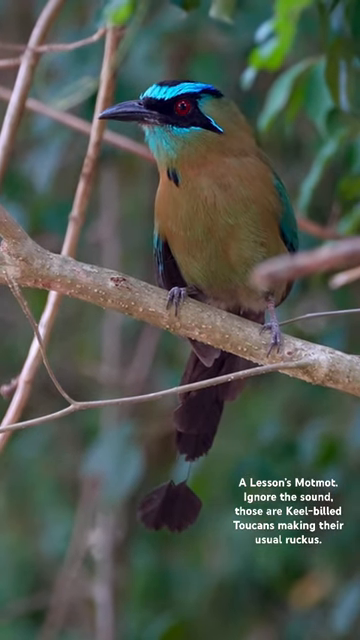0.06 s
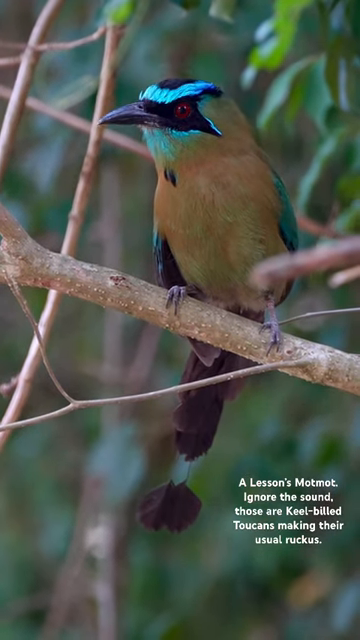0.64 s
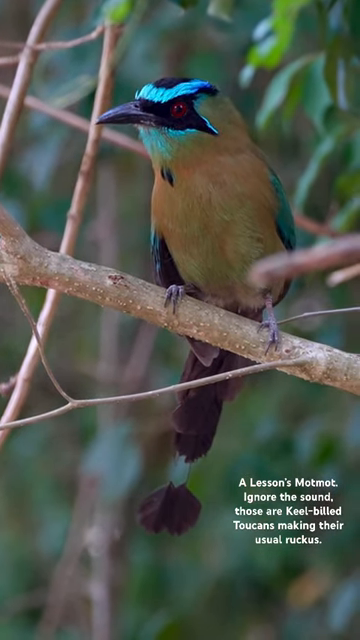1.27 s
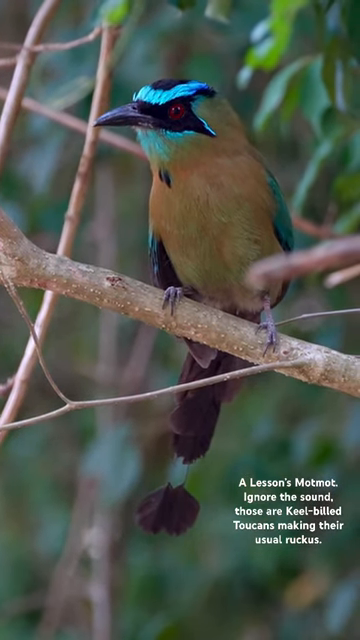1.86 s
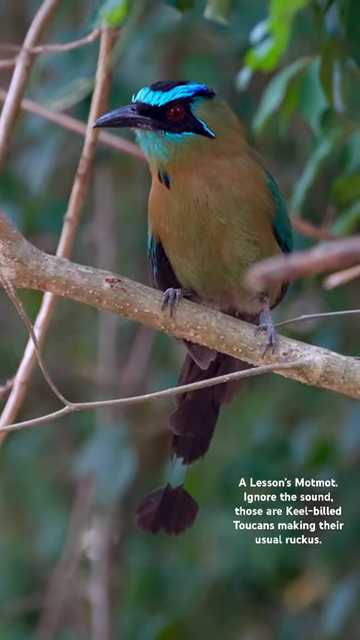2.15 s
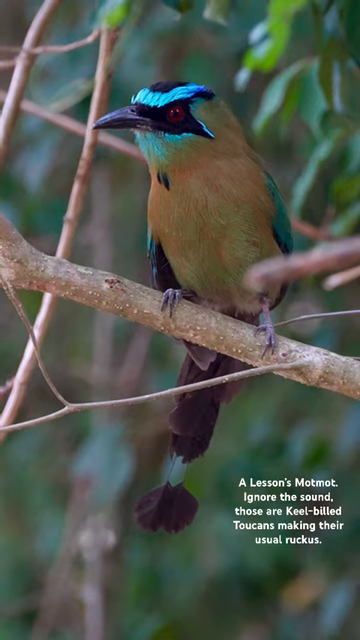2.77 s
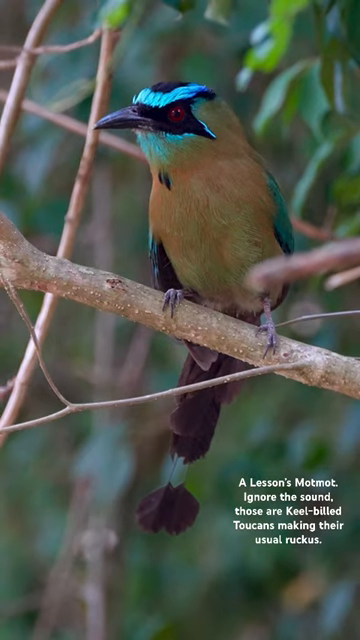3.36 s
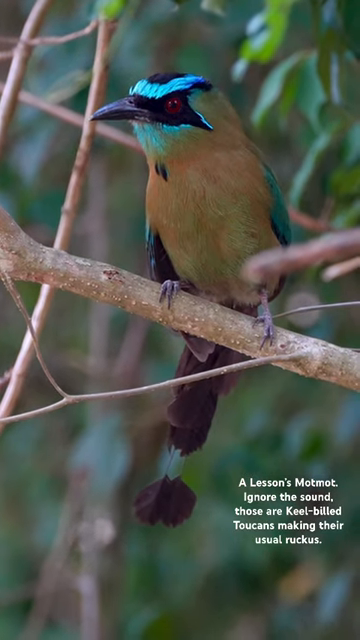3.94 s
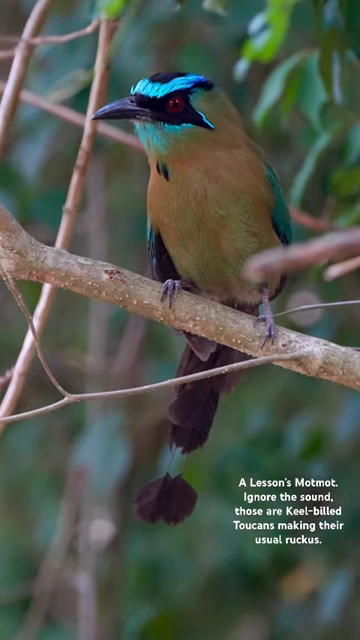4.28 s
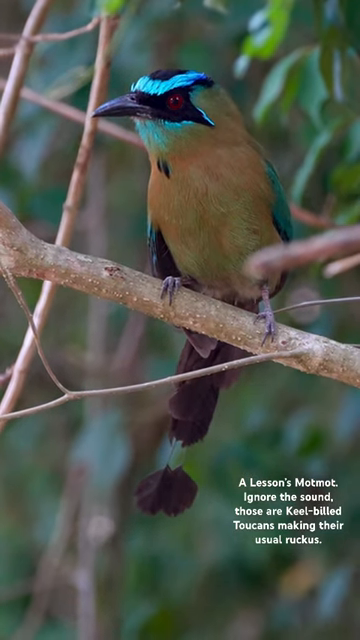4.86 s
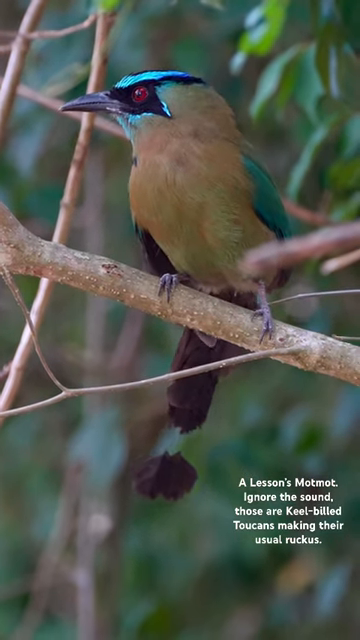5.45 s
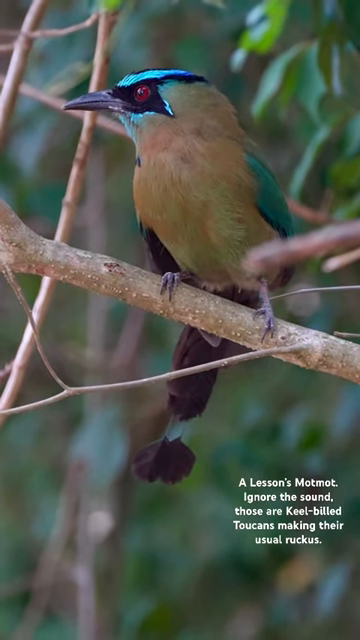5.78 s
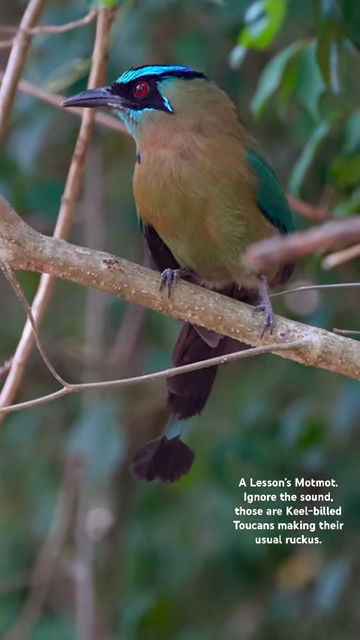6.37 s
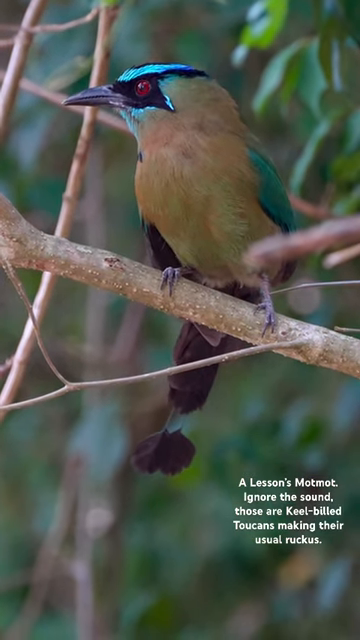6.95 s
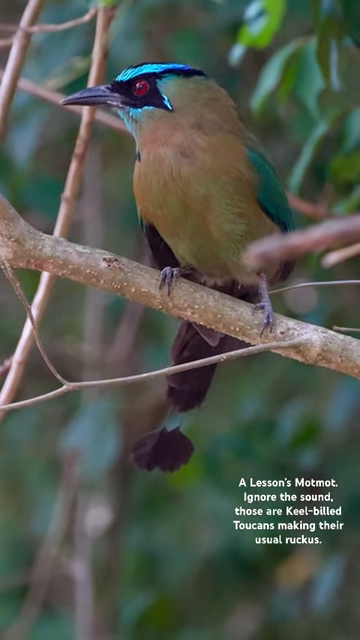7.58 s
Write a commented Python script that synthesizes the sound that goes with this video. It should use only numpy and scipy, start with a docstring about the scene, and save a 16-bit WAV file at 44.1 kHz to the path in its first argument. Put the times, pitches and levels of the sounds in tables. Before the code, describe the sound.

Two toucans take turns croaking in a forest, one harsh and raspy, the other mellower and a little louder. Each croak is a short, quickening rattle, repeated a little more than once a second by each bird. Behind them insects hiss and ring steadily at a high pitch. Small birds add faint chips, twitters and falling whistles, mostly near the end. The trees give the calls a soft echo.

```python
"""A rasping toucan croaks over hissing insects; a mellow one answers, and the two take turns.
Each croak is a quickening rattle of tone bursts from the syrinx, filtered by throat and bill.
Small birds whistle, chip and twitter. Insects hiss and ring over a very faint low rumble.
The shrill high hiss briefly drops out in one channel or the other.
Forest trunks give the birds a few early echoes, foliage a soft tail."""
import sys
import numpy as np
from scipy import signal
from scipy.fft import rfft, irfft
from scipy.io import wavfile
from scipy.ndimage import uniform_filter1d

SR = 44100
rng = np.random.default_rng(int(sys.argv[2]) if len(sys.argv) > 2 else 0)


def wrap_up_sound(samples):
    """Save the sound to the file named by the first command line argument, as 16-bit audio."""
    columns = np.atleast_2d(samples).T
    # keep every value between -1 and 1, then stretch to whole-number steps
    tamed = np.clip(columns, -1, 1)
    steps = np.round(tamed * 32767).astype(np.int16)
    wavfile.write(sys.argv[1], SR, steps)


N = 336042
TIME_S = np.arange(N) / SR

# noise spectra (frequency [Hz], density [dB])
RUMBLE_SPECTRUM = [(20, -3.5), (42, -7), (55, 0), (70, -9), (120, -17), (250, -13.5), (400, -20.5),
                   (1300, -25), (3000, -31)]
WIDE_AIR_SPECTRUM = [(30, 1), (250, -3), (500, -1.5), (1400, -.5), (4000, -19.5)]
HISS_SPECTRUM = [(1300, -35.5), (2000, -15), (2700, -10), (3300, -9.5), (4200, -8.5), (5000, -3),
                 (5700, -2), (6800, -4.5), (8000, -9.5), (9000, -7), (9800, -15.5), (12000, -14),
                 (15000, -12.5)]
SHRILL_SPECTRUM = [(9000, -45), (10500, -11), (11800, -0.5), (12600, -4), (13300, -5), (14500, -1),
                   (15200, -6)]
RASP_SPECTRUM = [(1400, -20), (1650, -9), (1950, 10.5), (2550, -13.5), (3100, -11.5), (3650, -12.5),
                 (4400, -10.5), (5400, -16), (9000, -27)]
# reverb spectra (frequency [Hz], gain [dB])
SONGBIRD_TAIL = [(3000, 3.5), (6000, -1), (10000, 5)]
TOUCAN_TAIL = [(1500, -.5), (1730, -7), (1805, -1), (1870, -5), (1950, -4), (3500, -3), (8000, -3.5)]
# vocal tract responses (frequency [Hz], gain [dB])
CHIP_THROAT = [(3100, -28), (3700, -10.5), (4600, -20), (6000, -6), (8200, -12), (9200, -21)]
TOUCAN_BILL = [(1300, -52), (1480, -11.5), (1620, -5), (1830, -1), (2050, -3), (2450, -5), (3300, -3),
               (5600, 0), (9000, -13)]
# trunk echoes (delay [s], level [dB])
TRUNK_ECHOES = [(.0062, -18), (.0122, -12), (.026, -21), (.043, -23)]
# ringing insects (frequency [Hz], level [dB])
INSECT_TONES = [(5707, -78), (6137, -75), (7246, -81), (8559, -84), (10664, -90.5), (11413, -83.5),
                (11854, -79), (12042, -81.5), (12516, -77.5), (13808, -81), (14266, -72), (14535, -79.5),
                (14707, -79.5)]
# the shrill high hiss briefly drops out in one channel (start [s], end [s])
LEFT_DROPOUTS = [(.40, 1.25)]
RIGHT_DROPOUTS = [(-.2, .52), (6.27, 7.29)]
# thin rising whistles (time [s], length [s], start pitch [Hz], final pitch [Hz], level [dB])
FAR_WHISTLES = [(6.495, 0.3, 3540, 3715, -66.5), (6.919, 0.23, 3490, 3730, -70)]
# runs of quick notes (time [s], length [s], first pitch [Hz], first level [dB])
TWITTERS = [(1.113, .04, 6000, -70), (3.118, .11, 7480, -59), (4.41, .04, 5250, -59),
            (5.701, .17, 5534, -55), (7.168, .21, 5550, -48.5)]
# clear falling whistles (time [s], length [s], pitch [Hz], level [dB])
WHISTLES = [(3.015, .13, 6320, -46), (5.37, .11, 6455, -60), (6.805, .13, 6320, -45),
            (7.165, 0.1, 6090, -43)]
# buzzy chips (time [s], length [s], fundamental [Hz], level [dB])
CHIPS = [(.608, 0.039, 737, -52), (1.10, .047, 847, -53.5), (4.062, 0.042, 733, -54),
         (7.468, 0.048, 807, -49)]
# croaks (rattle start [s], crest time [s], close length [s], crest level [dB], crest pitch [Hz])
MELLOW_CROAKS = [(.387, .451, 0.11, -33.5, 1761), (1.133, 1.279, .033, -30.5, 1794),
                 (1.944, 2.047, 0.05, -30, 1773), (2.748, 2.814, 0.064, -31.5, 1766),
                 (3.518, 3.619, .032, -32, 1789), (4.261, 4.359, 0.034, -33, 1794),
                 (5.020, 5.132, .041, -32, 1774), (5.897, 5.987, 0.039, -32, 1756),
                 (7.436, 7.482, 0.063, -34.5, 1700)]
RASPING_CROAKS = [(.132, .218, 0.014, -36, 1773), (.954, 1.030, 0.038, -38, 1746),
                  (1.738, 1.824, 0.028, -37.5, 1774), (2.618, 2.663, 0.023, -38, 1761),
                  (3.691, 3.734, 0.024, -37.5, 1775), (4.535, 4.623, .026, -36, 1799),
                  (5.538, 5.583, .023, -37, 1790), (6.400, 6.423, 0.027, -37, 1760),
                  (7.306, 7.398, 0.013, -37.5, 1799)]


def undb(db):
    """Decibels to gain."""
    return 10 ** (np.asarray(db) / 20)


def gain_at(hz, spectrum):
    """Spectrum gain, interpolated over log frequency."""
    knots_hz, db = np.transpose(spectrum)
    return undb(np.interp(np.log(np.maximum(hz, 1)), np.log(knots_hz), db))


def coloured(x, spectrum):
    """Zero-phase filter."""
    n = x.shape[-1]
    return irfft(rfft(x) * gain_at(np.arange(n // 2 + 1) * SR / n, spectrum), n)


def noise(spectrum, shape):
    """Coloured noise, rms 1."""
    y = coloured(rng.standard_normal(shape), spectrum)
    return y / y.std()


def walk(rate_hz, n=N):
    """Smooth random wander, spread near 1."""
    step = max(int(SR / rate_hz), 1)
    return 1.2 * uniform_filter1d(np.repeat(rng.standard_normal(n // step + 1), step), step)[:n]


def phase_of(hz):
    """Running phase [rad] of a pitch curve."""
    return 2 * np.pi * np.cumsum(hz) / SR


def hump(peak_s, width_s):
    """Gaussian swell, peak 1."""
    return np.exp(-((TIME_S - peak_s) / width_s) ** 2)


def arch(u, peak_at):
    """Sine rise and fall over u = 0..1."""
    return np.sin(np.pi / 2 * np.interp(u, [0, peak_at, 1], [0, 1, 0]))


def pan(left_db):
    """Stereo gains for a left-minus-right level."""
    return undb(np.array([[1], [-1]]) * left_db / 2)


def add(out, time_s, sound):
    """Mix a sound in at time_s."""
    i = max(int(time_s * SR), 0)
    part = sound[..., :max(N - i, 0)]
    out[..., i:i + part.shape[-1]] += part


def air(rumble_db=-82.5, drone_db=-80.5, drone_hz=55):
    """Faint rumble, centred in the bass; a low drone swells once."""
    wide = undb(-6) * noise(WIDE_AIR_SPECTRUM, (2, N))
    drone = np.sin(phase_of(drone_hz + 3 * walk(15))) * hump(peak_s=3.35, width_s=.45)
    return (noise(RUMBLE_SPECTRUM, N) + wide) * undb(rumble_db) + undb(drone_db) * drone


def dropout(spans, fade_s=.2):
    """1 inside the spans, 0 outside, ramped edges."""
    return sum(np.clip(.5 + np.minimum(TIME_S - start_s, end_s - TIME_S) / fade_s, 0, 1)
               for start_s, end_s in spans)


def insects():
    """Shrill high hiss, ringing tones to the left, flickering far hiss; all swell once."""
    swell = hump(peak_s=3.14, width_s=2.15)
    # the shrill hiss briefly drops out in one channel; the other dips slightly
    dropouts = np.array([dropout(LEFT_DROPOUTS), dropout(RIGHT_DROPOUTS)])
    shrill_db = -57 + swell - 19.5 * dropouts - 1.5 * dropouts[::-1]
    shrill = noise(SHRILL_SPECTRUM, (2, N)) * undb(shrill_db + .5 * walk(20)) * pan(2.4)
    drift = 1 + .0004 * walk(1)
    tones = np.zeros(N)
    for hz, db in INSECT_TONES:
        gain = undb(db + 2.5 * walk(2) + 2 * walk(12))
        tones += gain * np.sin(phase_of(hz * drift + 11 * walk(90)))
    ringing = tones * undb(-6 + 14 * swell) * pan(3.6)
    hiss = noise(HISS_SPECTRUM, (2, N)) + .12 * noise(HISS_SPECTRUM, N)
    hiss_db = -63.5 + 5 * swell + walk(14)
    return shrill + ringing + hiss * undb(hiss_db) * pan(-1.4)


def forest(x, early_db, tail_db, t60_s, spectrum, scatter_db=-14, scatter_t60_s=.14):
    """Direct sound plus trunk echoes, blur from close branches and a long foliage tail."""
    t = np.arange(SR) / SR
    tail = noise(spectrum, (2, SR)) * undb(-60 * t / t60_s) * np.minimum(t / .0077, 1)
    peak_power = uniform_filter1d(abs(rfft(tail)) ** 2, size=200).max()
    tail *= undb(tail_db) / np.sqrt(peak_power)
    scatter = noise(spectrum, (2, SR)) * undb(-60 * t / scatter_t60_s) * np.minimum(t / .005, 1)
    response = tail + undb(scatter_db) * scatter / np.sqrt(np.sum(scatter ** 2) / 2)
    for delay_s, db in TRUNK_ECHOES:
        for ear in response:
            ear[int((delay_s + rng.uniform(0, .0004)) * SR)] += undb(db + early_db)
    return x + signal.fftconvolve(x, response, axes=1)[:, :N]


def far_whistler():
    """Thin notes that slide up, level off and peak late."""
    out = np.zeros(N)
    for time_s, length_s, start_hz, final_hz, db in FAR_WHISTLES:
        u = np.linspace(0, 1, int(length_s * SR))
        hz = final_hz + (start_hz - final_hz) * (1 - u) ** 2
        envelope = np.sqrt(abs(np.sin(np.pi * u ** 2)))
        add(out, time_s, undb(db) * envelope * np.sin(phase_of(hz)))
    return out


def twitter_notes(gap_s=.061, note_s=.04, sag_hz_per_s=2200, fade_db_per_s=17):
    """Evenly spaced notes, each lower and fainter than the last in its run."""
    return [(time_s + late_s, note_s, hz - sag_hz_per_s * late_s, db - fade_db_per_s * late_s)
            for time_s, length_s, hz, db in TWITTERS for late_s in np.arange(0, length_s, gap_s)]


def songbird(notes, glide, waver, peak_at, throat=None):
    """Pure or throat-shaped harmonic notes; glide = pitch ratios at start, middle, end."""
    out = np.zeros(N)
    contour = np.polyfit([0, .5, 1], glide, 2)
    for time_s, length_s, pitch_hz, db in notes:
        n = int(length_s * SR)
        u = np.arange(n) / n
        hz = pitch_hz * np.polyval(contour, u) * (1 + waver * walk(400, n))
        phase = phase_of(hz)
        if throat is None:
            tone = np.sin(phase)
        else:
            tone = sum(gain_at(k * hz, throat) * np.sin(k * phase + rng.uniform(0, 2 * np.pi))
                       for k in range(4, 14))
        add(out, time_s, undb(db + 2 * walk(120, n)) * arch(u, peak_at) ** .49 * tone)
    return out * pan(-1.1)


def pulse_times(start_s, crest_s, close_s, close_gap_s, tick_gap_s=.0335, open_gap_s=.0212, gap_s=.023):
    """Two lone ticks, up to three opening pulses, a wider-spaced swell, a quick close."""
    ticks = [start_s - 2 * tick_gap_s, start_s - tick_gap_s]
    opening = start_s + open_gap_s * np.arange(3)
    opening = opening[opening < crest_s - gap_s / 2]
    swelling = np.arange(crest_s - gap_s, max(opening, default=start_s) + gap_s / 2, -gap_s)
    closing = crest_s + np.linspace(0, close_s, max(round(close_s / close_gap_s), 1) + 1)
    return [*ticks, *opening, *swelling, *closing]


def syrinx_pulse(hz, length_s, overtones_db, jitter_rad, peak_at):
    """Short harmonic burst with unsteady phase."""
    n = int(length_s * SR)
    phase = 2 * np.pi * hz * np.arange(n) / SR + jitter_rad * walk(700, n)
    tone = sum(undb(db) * np.sin(k * phase) for k, db in enumerate([0, *overtones_db], 1))
    return tone * arch(np.arange(n) / n, peak_at) ** 2


def rasp(rise_s=.0064, decay_s=.026):
    """Puff of air trailing a pulse."""
    t = np.arange(SR // 20) / SR
    return noise(RASP_SPECTRUM, len(t)) * np.exp(-t / decay_s) * np.minimum(t / rise_s, 1)


def toucan(croaks, pulse_s, last_pulse_s, close_gap_s, peak_at, glide_hz, close_rise_hz,
           overtones_db, jitter_rad, rasp_db, last_db, pan_db, swell_db=15):
    """Pulses grow and rise to the crest, then quicken and shorten; throat and bill filter them."""
    out = np.zeros((2, N))
    for start_s, crest_s, close_s, crest_db, crest_hz in croaks:
        for k, time_s in enumerate(pulse_times(start_s, crest_s, close_s, close_gap_s)):
            early = max(crest_s - time_s, 0) / .1  # tenths of a second before the crest
            after = max(time_s - crest_s, 0) / close_s  # 0 up to the crest, 1 at the last pulse
            closure = np.sqrt(after)
            length_s = (pulse_s + (last_pulse_s - pulse_s) * closure) / (1 + .35 * early)
            hz = crest_hz - glide_hz * early + close_rise_hz * closure + 20 * rng.standard_normal()
            # effort rounds off near the crest; first tick barely voiced
            slack = early ** 2 / (.5 + early) + .7 * (k == 0)
            db = crest_db - swell_db * slack + last_db * after ** 4 + rng.standard_normal()
            gain = undb(db) * pan(pan_db)
            pulse = syrinx_pulse(hz, length_s, overtones_db, jitter_rad * (1 + after), peak_at)
            add(out, time_s - peak_at * length_s, gain * pulse)
            add(out, time_s - .003, gain * undb(rasp_db + 7.6 * closure) * rasp())
    return coloured(out, TOUCAN_BILL)


def scene():
    """Two toucans and small birds among trees, over insects and air."""
    mellow = toucan(MELLOW_CROAKS, pulse_s=.0205, last_pulse_s=.016, close_gap_s=.0148, peak_at=.48,
                    glide_hz=75.6, close_rise_hz=30.3, overtones_db=[-20, -23, -38], jitter_rad=.16,
                    rasp_db=-30.5, last_db=-15.5, pan_db=1)
    rasping = toucan(RASPING_CROAKS, pulse_s=.016, last_pulse_s=.009, close_gap_s=.0125, peak_at=.33,
                     glide_hz=139, close_rise_hz=65, overtones_db=[-12, -14, -23], jitter_rad=.21,
                     rasp_db=-20.5, last_db=-2, pan_db=3)
    toucans = forest(mellow + rasping, early_db=5.5, tail_db=-4.5, t60_s=.9, spectrum=TOUCAN_TAIL)
    whistles = songbird(WHISTLES, glide=(.99, .875, .742), waver=.011, peak_at=.28)
    twitters = songbird(twitter_notes(), glide=(.98, .95, .73), waver=.025, peak_at=.38)
    chips = songbird(CHIPS, glide=(.93, 1.01, .91), waver=.022, peak_at=.3, throat=CHIP_THROAT)
    calls = whistles + chips + far_whistler()
    clear_birds = forest(calls, early_db=1.5, tail_db=1.5, t60_s=.6, spectrum=SONGBIRD_TAIL)
    deep_birds = forest(twitters, early_db=-3, tail_db=13, t60_s=.77, spectrum=SONGBIRD_TAIL)
    return toucans + clear_birds + deep_birds + insects() + air()


def record(dry, top_hz=15100):
    """Steep low-pass."""
    return signal.sosfilt(signal.ellip(10, .2, 70, top_hz, fs=SR, output="sos"), dry)


dry = scene()
out = record(dry)
wrap_up_sound(out)
```